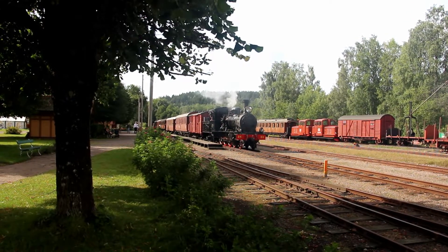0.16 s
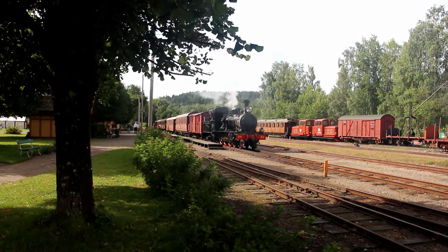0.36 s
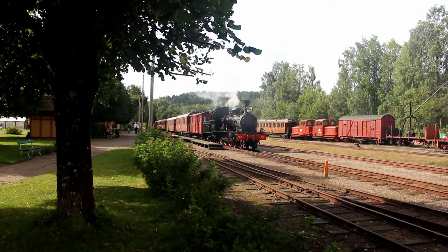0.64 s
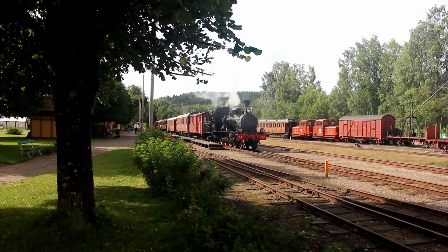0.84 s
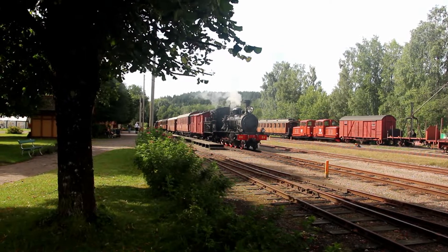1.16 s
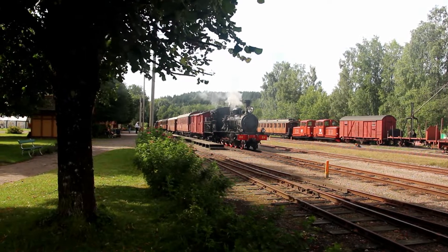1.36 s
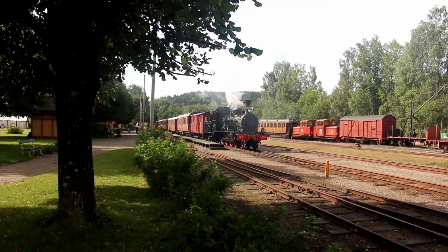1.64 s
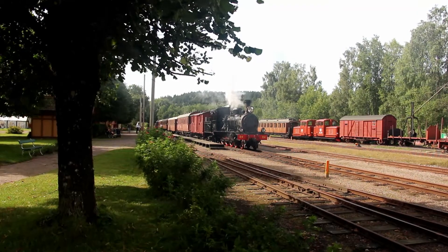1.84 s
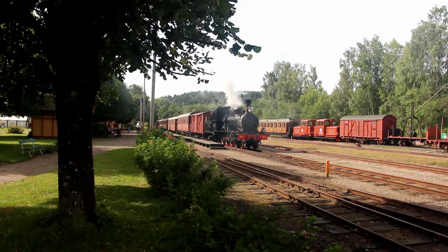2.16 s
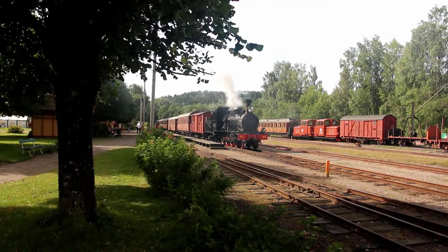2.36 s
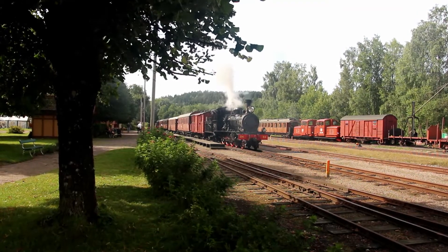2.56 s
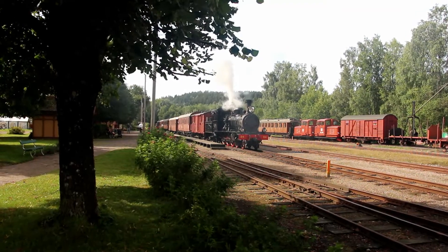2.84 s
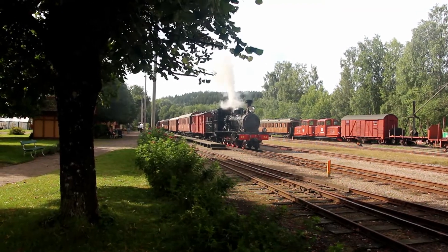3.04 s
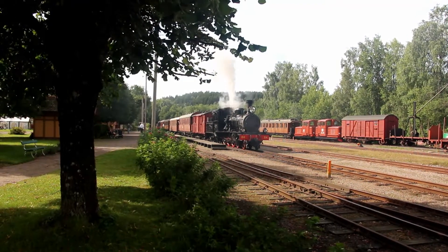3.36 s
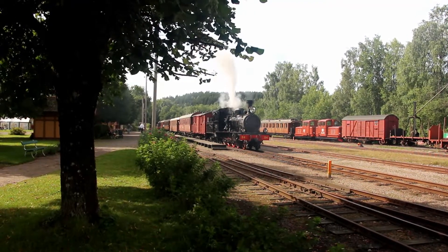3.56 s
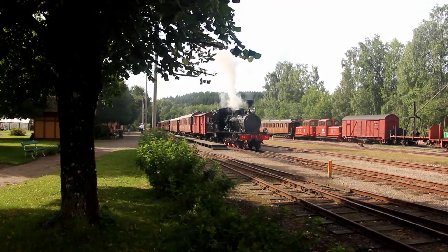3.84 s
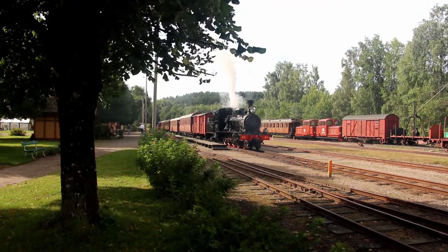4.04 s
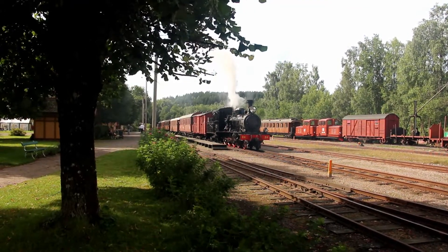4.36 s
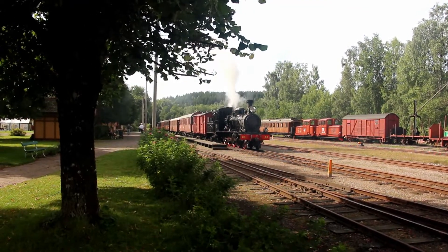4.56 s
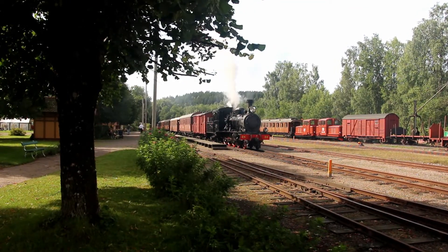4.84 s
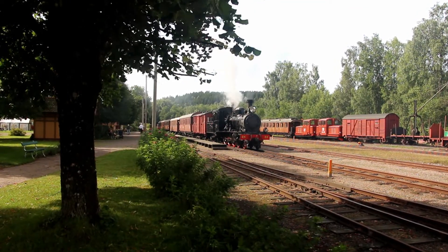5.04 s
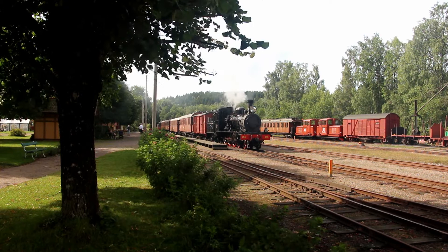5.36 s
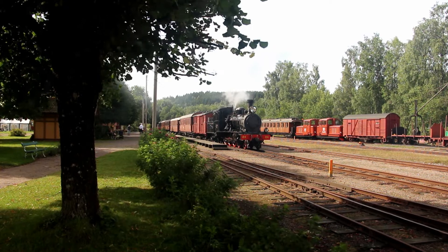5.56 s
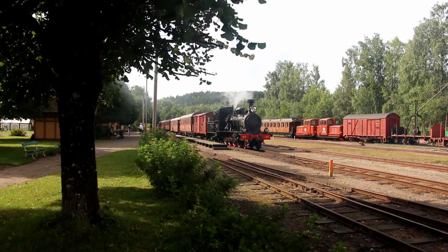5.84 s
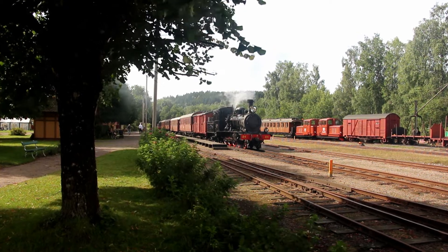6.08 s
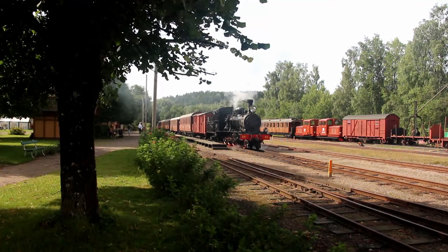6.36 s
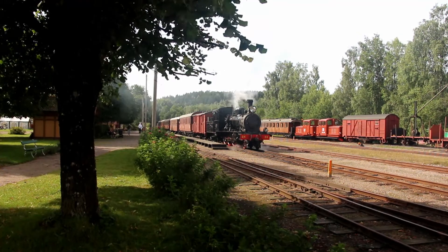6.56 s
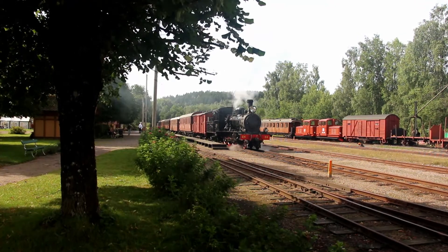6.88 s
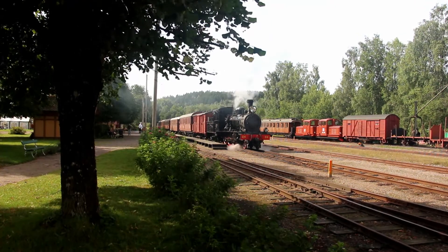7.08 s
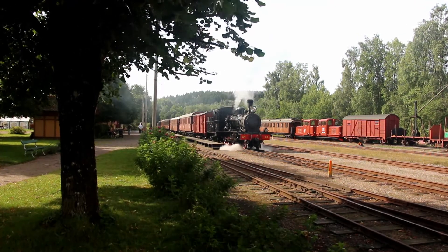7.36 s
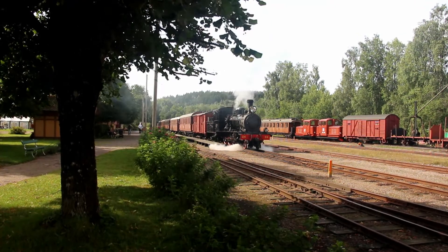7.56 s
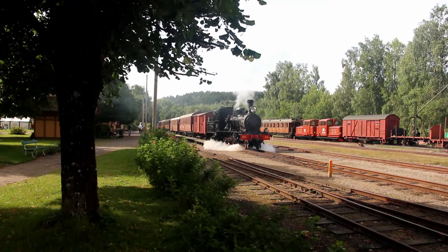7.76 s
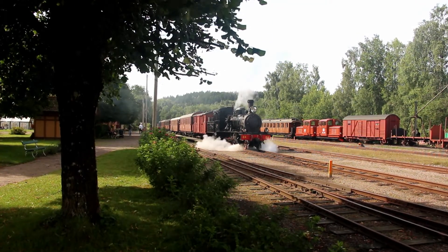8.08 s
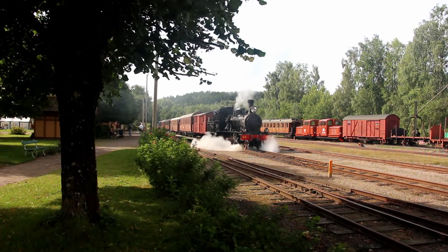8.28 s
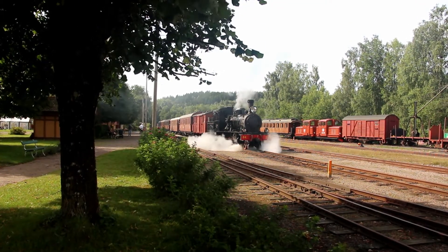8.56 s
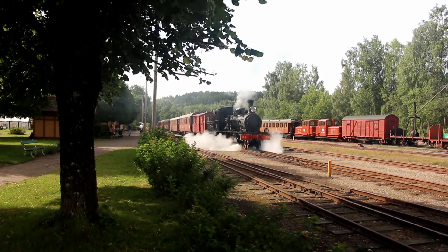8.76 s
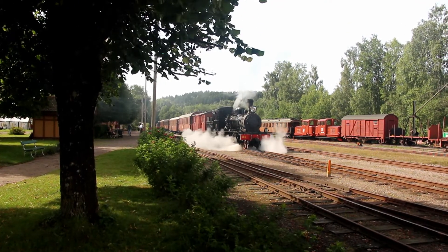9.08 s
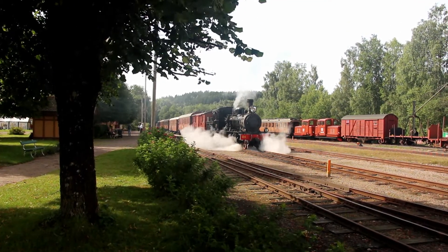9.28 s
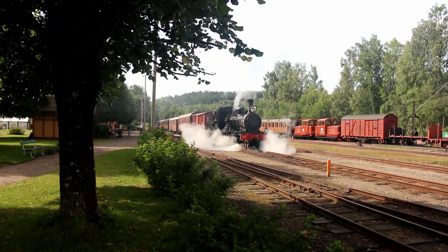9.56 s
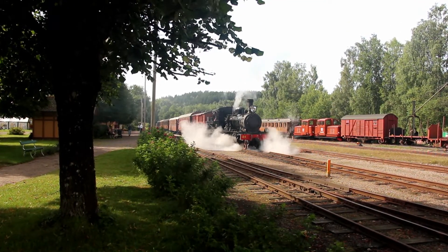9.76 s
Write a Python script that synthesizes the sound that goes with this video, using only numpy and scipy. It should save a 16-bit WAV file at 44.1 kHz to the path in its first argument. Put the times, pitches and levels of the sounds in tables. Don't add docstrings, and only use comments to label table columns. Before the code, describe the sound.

Heard from some distance across an open yard: coarse, resonant steam hiss leaning left, faint low rumble far off, and lumpy low wind buffets at the microphone. The engine whistles twice, one short and rising, one long, breathy and fluttering, each leaving a diffuse echo. Automatic level control pushes the hiss down, then lets it creep back. Near the end wind is slight and cylinder drains open with a sustained, wide hiss.

```python
import sys
import numpy as np
from scipy import signal
from scipy.fft import rfft, irfft, next_fast_len
from scipy.io import wavfile
from scipy.ndimage import uniform_filter1d, map_coordinates

SR = 44100
rng = np.random.default_rng(int(sys.argv[2]) if len(sys.argv) > 2 else 0)


def ratio_of_db(decibels):
    return 10 ** (np.asarray(decibels, float) / 20)


def waveform_to_disk(signal):
    frames = np.transpose(np.atleast_2d(signal))
    scaled = np.clip(frames, -1, 1) * 32767
    samples = np.round(scaled).astype(np.int16)
    wavfile.write(sys.argv[1], SR, samples)


N = 437014

# time [s], level [dB], brightness [dB]
STEAM = [(0, -29.5, -7.5), (.33, -31.5, -8.5), (.55, -34, -6), (.9, -32.5, -5), (1.4, -32, -5.5),
         (1.65, -38, -8), (1.87, -41, -9), (2.37, -36, -8), (2.8, -32, -4.5), (3.06, -36.5, -5),
         (3.45, -34, -7.5), (3.9, -43.5, -4.5), (4.03, -39, -3.5), (4.85, -46, -7.5), (5.65, -33.5, -3),
         (6.3, -28, -5.5), (7.1, -28, -2.5), (8.2, -32.5, 0.5)]


def unit(x):
    return x / np.sqrt(np.mean(x ** 2) + 1e-20)


def along(points, hz):
    point_hz, value = np.transpose(points)
    return np.interp(np.log(hz + 1), np.log(point_hz + 1), value)


def curves(rows, outside=None):
    s, *columns = np.transpose(rows)
    t = np.arange(N) / SR
    return [np.interp(t, s, column, outside, outside) for column in columns]


def wobble(rate_hz):
    knots = rng.standard_normal(int(N * rate_hz / SR) + 4)
    return map_coordinates(knots, [np.arange(N) * rate_hz / SR])


def filtered(x, response):
    m = next_fast_len(N + 8192)
    return irfft(rfft(x, m) * response(np.fft.rfftfreq(m, 1 / SR)), m)[..., :N]


def bells(t, centre_s, length_s):
    return (2 * (t - centre_s) / length_s) ** 2


def gain_control():
    jet_rest_db = -26
    return ratio_of_db(curves(STEAM)[0] - jet_rest_db)


def town():
    # pitch_hz, density_db [dB per Hz]
    rumble = [(20, -12), (60, -6), (120, -3), (250, -2), (450, -10), (650, -16), (1000, -40)]
    common, own = rng.standard_normal(N), rng.standard_normal((2, N))
    return ratio_of_db(-42.5) * unit(filtered(common + 0.61 * own, lambda hz: ratio_of_db(along(rumble, hz))))


def stereo_noise(patchy_db):
    # pitch_hz, correlation [-1..1]
    alike = [(60, -0.63), (180, 0.42), (550, 0.99), (1650, 1), (4970, 0.73), (15000, 0.55)]
    # pitch_hz, level_db
    lean = [(600, 9), (1300, 5), (4400, 5), (15000, 7)]
    ground_hz = 900
    z = signal.stft(rng.standard_normal((2, N)), nperseg=512)[2]
    field = uniform_filter1d(rng.standard_normal(z.shape[1:]), 7, 0)
    field = uniform_filter1d(field, 16, 1)
    pair = signal.istft(z * ratio_of_db(patchy_db * unit(field)), nperseg=512)[1][:, :N]

    def mid_side(hz):
        angle = np.arccos(np.clip(along(alike, hz), -1, 1)) / 2
        return np.array([np.cos(angle), np.sin(angle)])

    def bounce_and_lean(hz):
        bounce = 1 + .23 * (hz > 5800) * np.cos(2 * np.pi * (hz - 7860) / ground_hz)
        return bounce * ratio_of_db(np.outer([.5, -.5], along(lean, hz)))

    mid, side = filtered(pair, mid_side)
    return filtered(np.array([mid + side, mid - side]), bounce_and_lean)


def jet_noise(patchy_db):
    # centre_hz, width_hz, level_db
    resonant_bands = [(600, 76, -15.5), (773.7, 87, 1), (907, 78, -1.5), (1127, 49, 3), (1287, 110, -7),
                      (1688, 52, -3.5), (1913, 108, 0), (2056, 91, 2), (2540, 100, -6.5), (2718, 98, 0),
                      (2870, 22, 1), (3047, 190, -5), (3702, 395, -0.5), (4100, 270, -7.5), (4550, 520, -5.5),
                      (5170, 270, -7.5), (5597, 66, -0.5)]
    # pitch_hz, level_db
    valley = [(450, -60), (560, -12), (1000, -10.5), (1500, -9), (3000, -8), (6000, -9), (16000, -8.5)]
    # pitch_hz, density_db [dB per Hz]
    fizz_shape = [(3240, -31), (5500, -10), (6250, 2), (7960, -2), (9130, -6), (9840, -6), (14200, -14.5),
                  (15800, -22.5)]

    def colour(hz):
        bands = sum(ratio_of_db(db) ** 2 / (1 + (2 * (hz - c) / w) ** 4) for c, w, db in resonant_bands)
        body = np.sqrt(bands + ratio_of_db(along(valley, hz)) ** 2)
        return body * ratio_of_db(along(fizz_shape, np.maximum(hz, 6200)))

    return filtered(stereo_noise(patchy_db), colour)


def spurts():
    # centre_s, change_db, length_s
    spurt_rows = [(0.154, 4.5, 0.53), (0.91, 3.5, 0.19), (1.307, 2.5, .14), (1.53, -5, .06),
                  (1.6, 5, 0.057), (2.043, 4.5, 0.31), (2.692, 7.5, 0.17), (3.5, 2, .08),
                  (3.723, -1.5, 0.094), (4.39, 6.5, .16), (5.72, 2, .12), (5.88, 3.5, 0.11),
                  (6.094, 0.5, 0.1), (6.586, 2.5, .12), (6.873, -4, 0.17), (8.36, 3, 0.3), (9.1, -1, 0.16)]
    s, db, length_s = np.transpose(spurt_rows)[:, :, None]
    t = np.arange(0, N, 256) / SR
    return np.interp(np.arange(N) / SR, t, (db * np.exp(-bells(t, s, length_s))).sum(0))


def steam():
    # time_s, roar_db
    roar_fades = [
        (7.2, 0.5),
        (7.7, -3),
        (9.0, -3),
    ]
    jet_db, bright_db = curves(STEAM)
    noise = jet_noise(patchy_db=1.0)

    def above(hz, edge_hz):
        return 1 / (1 + (edge_hz / (hz + 1)) ** 12)

    roar = filtered(noise, lambda hz: 1 - above(hz, 910))
    jet = filtered(noise, lambda hz: above(hz, 971) - above(hz, 3366))
    hiss = filtered(noise, lambda hz: above(hz, 3230) - above(hz, 6910))
    fizz = filtered(noise, lambda hz: above(hz, 6700))

    spurt_db = spurts()
    bright_db = bright_db + 0.69 * spurt_db
    breeze_db = 0.53 * wobble(5.1) + 0.1 * spurt_db
    drawn_db = curves(roar_fades)[0]
    roar_db = drawn_db - 3.37 + .9 * wobble(6)
    hiss_db = 0.72 * bright_db + 4.0 + .4 * drawn_db + breeze_db + .6 * wobble(8)
    fizz_db = bright_db + 0.23 * spurt_db + 1.5 + breeze_db + .8 * wobble(7)
    low = ratio_of_db(roar_db) * unit(roar) + ratio_of_db(4 + breeze_db) * unit(jet)
    high = ratio_of_db(hiss_db) * unit(hiss) + ratio_of_db(fizz_db) * unit(fizz)
    return ratio_of_db(jet_db) * (low + high)


def gusts():
    # centre_s, peak_db, length_s, sharpness_db [flap over thud]
    gust_rows = [(0.333, -20.5, 0.18, -2), (0.514, -19.5, 0.21, -0.5), (0.76, -22, 0.14, -4),
                 (1.0, -21, .22, -3), (1.24, -23, 0.12, -10), (1.42, -19, .16, -5), (1.56, -19, .1, 0),
                 (1.87, -29, .2, -4), (2.3, -21, 0.19, 0), (2.572, -19, 0.083, -1.5), (2.76, -24, 0.11, -6),
                 (2.932, -26, 0.057, -6), (3.161, -27, 0.11, -7), (3.34, -25.5, 0.3, -2.5),
                 (3.64, -35.5, 0.12, 1), (4.155, -36.5, 0.24, -7), (4.43, -35.5, 0.056, -18),
                 (5.305, -33.5, 0.054, -2), (5.454, -27, 0.073, -3), (5.61, -25, 0.054, -18),
                 (5.83, -26, 0.083, -6.5), (6.33, -39, .09, -14), (6.549, -31, 0.066, -24),
                 (6.802, -26.5, 0.076, -15), (7.053, -33, 0.085, -13), (7.504, -34, 0.17, -22),
                 (7.742, -33, 0.17, -9), (8.0, -40, .2, -18), (8.79, -42, 0.098, -18),
                 (9.534, -40, 0.18, -24)]
    # time_s, level_db
    lull_rows = [(0, -27.5), (3.5, -40), (4.0, -44), (4.75, -66), (5.3, -36.5), (6.1, -45), (7.9, -44),
                 (8.4, -69), (9.91, -61)]
    s, peak_db, length_s, sharp_db = np.transpose(gust_rows)[:, :, None]
    t = np.arange(0, N, 256) / SR
    puffs = ratio_of_db(peak_db - 3.9 * bells(t, s, length_s)) ** 2
    lull = ratio_of_db(np.interp(t, *np.transpose(lull_rows))) ** 2
    thud = lull + puffs.sum(0)
    flap = lull * ratio_of_db(-24) + (puffs * ratio_of_db(sharp_db) ** 2).sum(0)
    return np.sqrt([np.interp(np.arange(N) / SR, t, power) for power in (thud, flap)])


def wind():
    # pitch_hz, density_db [dB per Hz]
    buffet = [(15, -35), (30, -30), (60, -6.5), (110, 1), (170, -2.5), (230, -10.5), (330, -53)]
    # pitch_hz, density_db [dB per Hz]
    flap_shape = [(140, -19), (200, -1.5), (300, -5), (450, -13.5), (600, -19), (900, -71)]
    thud, flap = gusts()
    eddies_db = 3.8 * wobble(32)

    def flow(level_db):
        lumps = ratio_of_db(eddies_db + 2.5 * wobble(55))
        raw = np.array([lumps * filtered(rng.standard_normal(N), lambda hz: ratio_of_db(along(shape, hz)))
                        for shape in (buffet, flap_shape)])
        low, high = raw / np.sqrt(np.abs(uniform_filter1d(raw ** 2, size=5000)) + 1e-12)
        return ratio_of_db(level_db) * np.array([thud * low, flap * high])

    opposed, together = flow(0), flow(-7.5)
    left = ratio_of_db([1.2, -1.5]) @ (together + opposed)
    right = ratio_of_db([-1.2, 1.5]) @ (together - opposed)
    return np.array([left, right])


def throbbing():
    # centre_s, depth_db, width_ms
    throb_dips = [(1.782, 3.5, 22), (1.835, 11, 13), (1.937, 10.5, 13), (1.979, 4, 15), (2.005, 11, 10),
                  (2.061, 5, 6.1), (2.803, 20, 15), (2.891, 20, 23), (2.987, 12, 13), (3.114, 16, 38),
                  (3.181, 16, 9), (3.199, 8, 5.1), (3.231, 13, 11), (3.317, 21, 18), (3.356, 14, 17),
                  (3.392, 14, 16.6), (3.446, 12, 12), (3.503, 26, 16), (3.656, 19, 16), (3.697, 16, 5.8),
                  (3.768, 22, 7), (3.793, 17, 9.2), (3.956, 14, 14), (3.996, 10, 48), (4.093, 26, 14),
                  (4.364, 21, 40), (4.437, 16, 19), (4.495, 8, 8), (4.522, 11, 9.7), (4.563, 19, 24)]
    t, dip_db = np.arange(N) / SR, np.zeros(N)
    for s, depth_db, width_ms in throb_dips:
        near = slice(int((s - .2) * SR), int((s + .2) * SR))
        dip_db[near] -= 1.25 * depth_db * np.exp(-((t[near] - s) / (width_ms * 0.0007)) ** 2)
    return ratio_of_db(dip_db)


def whistle():
    # time_s, note_hz, note_db, carry_db [far over near], edge_db [overtone strength]
    short_blast = [(1.56, 1070, -71, -9, -15), (1.574, 1068, -26.5, -2, -20), (1.64, 1133, -14, -4.5, -14),
                   (1.74, 1156, -14, -12, -19), (1.88, 1187, -16, -8, -14), (2.03, 1207, -18.5, -4.5, -11),
                   (2.11, 1245, -21, -4.5, -21), (2.16, 1274, -29, -2, -16)]
    long_blast = [(2.7, 1420, -32.5, -10, -6), (2.8, 1367, -16.5, -7, 4), (2.881, 1352, -19.5, 1, 0),
                  (3.03, 1335, -16.5, -1, 1), (3.199, 1366, -20.5, -12.5, -2.5),
                  (3.552, 1353, -19.5, -10, 1.5), (3.819, 1389, -16.5, 0.5, -2.5),
                  (4.15, 1398, -18, -0.5, -2), (4.475, 1414, -20, 4, 2)]
    closing = [(4.52, 1341, -26.5, 6.5, -0.5), (4.63, 1265, -19, -3.5, -1), (4.73, 1160, -21, -3, -7.5),
               (4.82, 1135, -20, -12, -23), (4.859, 1033, -39.5, -17, -20)]
    # time_s, flutter [0..1]
    wetness = [(1.56, .02), (2.0, .04), (2.16, .15), (2.7, .9), (3.1, .45), (3.65, .5), (3.85, .12),
               (4.47, .06), (4.52, .2)]
    # multiple, level_db [under note], gain [dB per dB of edge], sag_db [lost per 100 Hz of sag]
    overtones = [
        (2, -14, 1.0, 1),
        (3, -14, 2.0, 5),
        (4, -20.5, 2.0, 6),
        (5, -29, 2.0, 18),
    ]
    full_hz = 1405
    tears_hz = 1300
    flutter, = curves(wetness)
    note_hz, note_db, carry_db, edge_db = curves(short_blast + long_blast + closing)
    turns = np.cumsum(note_hz * (1 + 0.0037 * flutter * wobble(25.06))) / SR

    t = np.arange(N) / SR
    in_short = (t > short_blast[0][0]) & (t < short_blast[-1][0])
    in_long = (t > long_blast[0][0]) & (t < closing[-1][0])
    valve = uniform_filter1d(1. * (in_short | in_long), size=600)
    effort_db = uniform_filter1d(note_db, size=8000)
    ragged_db = 30 * np.maximum(flutter - .55, 0)

    partials = [(1, note_db)]
    for k, db, gain, sag_db in overtones:
        sagged_db = sag_db * (full_hz - note_hz) / 100
        level_db = effort_db + db + gain * edge_db - sagged_db - ragged_db + 1.76 * wobble(9)
        partials.append((round(k), level_db))

    near, clear = np.zeros(N), np.zeros(N)
    for k, db in partials:
        share = np.clip(flutter + .2, 0, 1) if k > 1 else .25 * flutter
        note = valve * ratio_of_db(db + 3.5) * np.exp(2j * np.pi * k * turns)
        shimmer = np.sqrt(1 - share) + np.sqrt(share / 2) * (wobble(130) + 1j * wobble(130))
        near += np.real(shimmer * note) * (throbbing() if k == 1 else 1)
        clear += np.real(note)

    tearing = np.clip((note_hz - tears_hz) / 50, 0, 1) * np.clip(.35 + 1.3 * flutter, 0, 1)
    skirt = filtered(rng.standard_normal(N), lambda hz: 1 / (1 + (hz / 200) ** 2))
    near += valve * ratio_of_db(effort_db - 8) * tearing * unit(skirt) * np.cos(2 * np.pi * 1.05 * turns)
    return near, clear * ratio_of_db(carry_db)


def yard(x):
    # delay_s, level_db
    echo = [
        (0, -60),
        (.03, -13),
        (.12, 4),
        (.3, -3),
        (.86, -14.5),
        (.92, -19),
        (1.8, -27.5),
        (2.197, -70),
    ]
    delay_s, db = np.transpose(echo)
    t = np.arange(int(delay_s[-1] * SR)) / SR
    common, own = rng.standard_normal(len(t)), rng.standard_normal((2, len(t)))
    scatter_db = 1.5 * wobble(30)[:len(t)]
    tail = (common + 0.67 * own) * ratio_of_db(np.interp(t, delay_s, db) + scatter_db)
    wet = signal.fftconvolve(x[None], tail / np.linalg.norm(tail[0]), axes=1)[:, :N]
    return filtered(wet, lambda hz: 1 / (1 + (hz / 5000) ** 2))


def cocks():
    # time_s, level_db
    opening = [
        (0, -70),
        (7.1, -60),
        (7.5, -24.5),
        (8.1, -23.5),
        (9.0, -24.5),
        (9.91, -24),
    ]
    # pitch_hz, density_db [dB per Hz]
    drain = [(1500, -19), (2500, -2), (4300, 0.5), (6000, -4), (9000, -6.5), (15000, -18)]
    hiss = filtered(stereo_noise(patchy_db=-0.5), lambda hz: ratio_of_db(along(drain, hz)))
    return ratio_of_db(curves(opening)[0] + 0.44 * wobble(7.2)) * unit(hiss)


def groan():
    # centre_hz, level_db
    centre_hz, level_db = (170, -39.5)
    centre_s, length_s = 7.26, .22
    band = filtered(rng.standard_normal(N), lambda hz: 1 / (1 + ((hz - centre_hz) / 25) ** 2))
    t = np.arange(N) / SR
    return ratio_of_db(level_db) * unit(band) * np.exp(-bells(t, centre_s, length_s) ** 2)


def scene():
    gain = gain_control()
    near, far = whistle()
    heard = steam() + wind() + near * ratio_of_db([[2.6], [-3.1]]) + cocks() + groan()
    echoes = ratio_of_db(-4.0) * ratio_of_db([[1.5], [-1.5]]) * yard(far / gain)
    return heard / gain + echoes + town()


def roll_off(x):
    return signal.sosfilt(signal.butter(12, 15720, fs=SR, output="sos"), x)


def record(dry):
    x = dry * gain_control()
    x = x / (1 + np.abs(x / .8) ** 4) ** (1 / 4)
    top_hz = 15720
    return roll_off(filtered(x, lambda hz: hz < top_hz))


dry = scene()
out = record(dry)
waveform_to_disk(out)
```